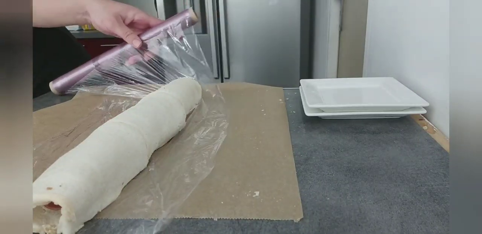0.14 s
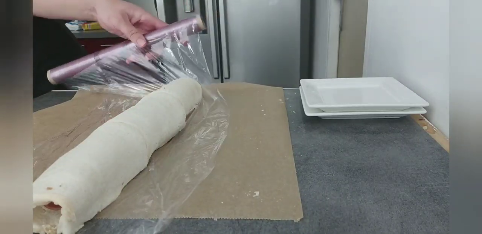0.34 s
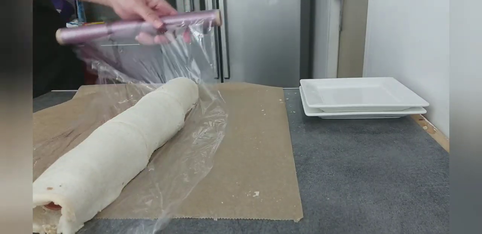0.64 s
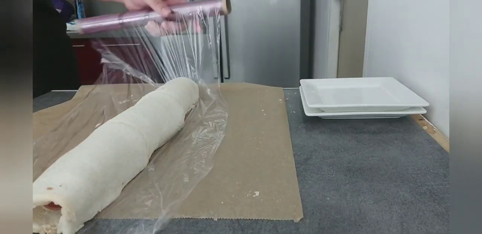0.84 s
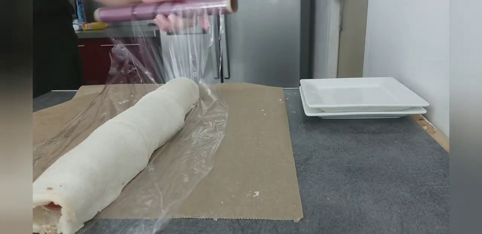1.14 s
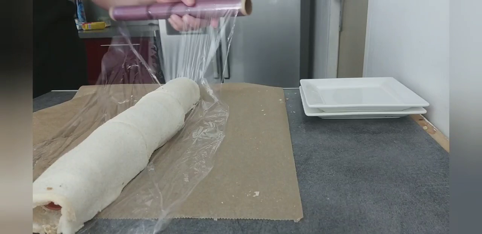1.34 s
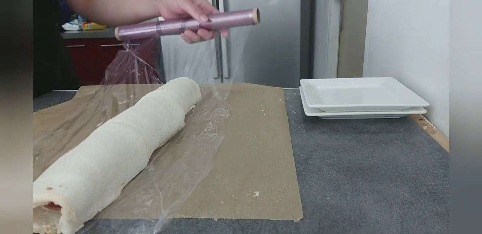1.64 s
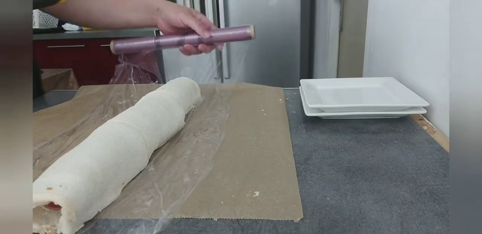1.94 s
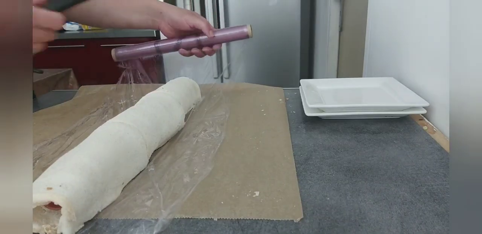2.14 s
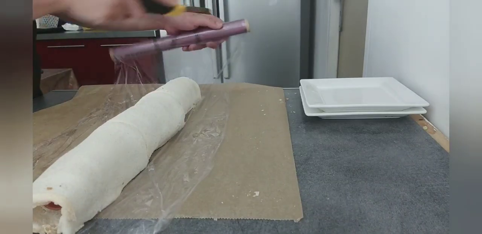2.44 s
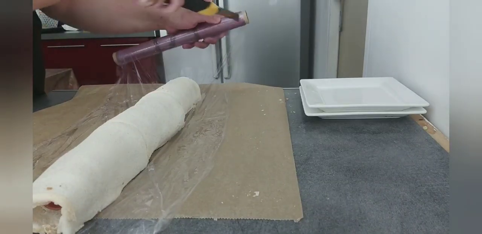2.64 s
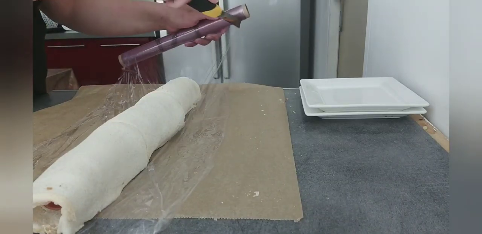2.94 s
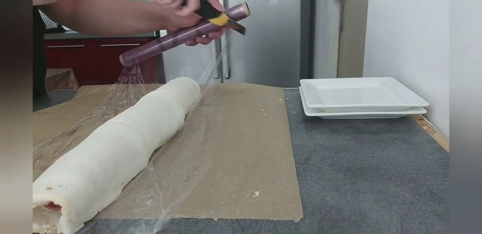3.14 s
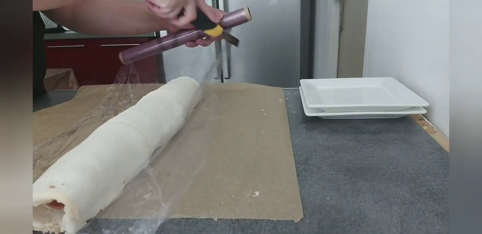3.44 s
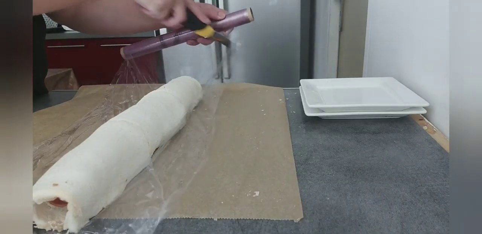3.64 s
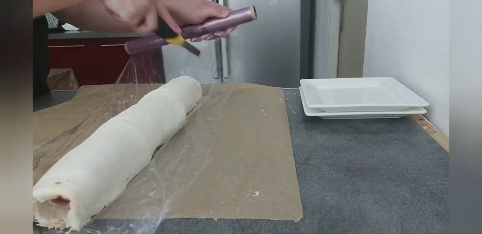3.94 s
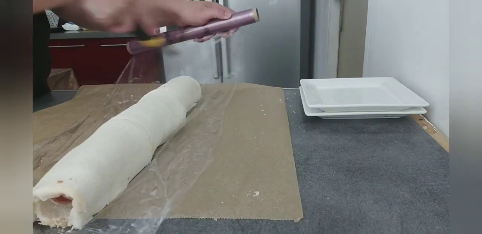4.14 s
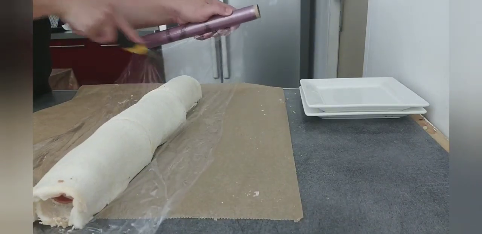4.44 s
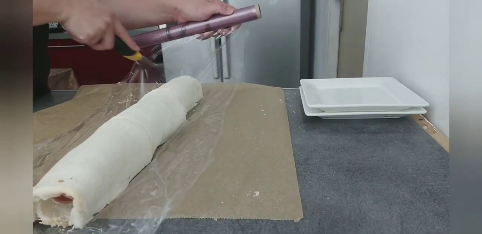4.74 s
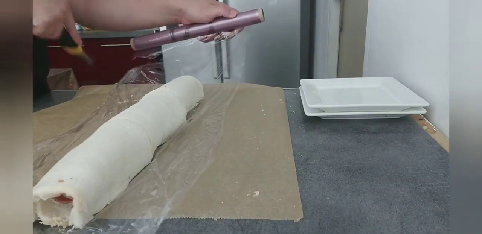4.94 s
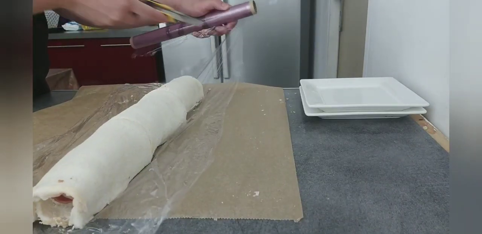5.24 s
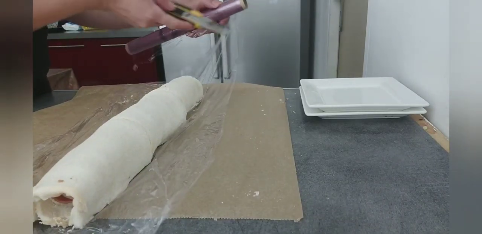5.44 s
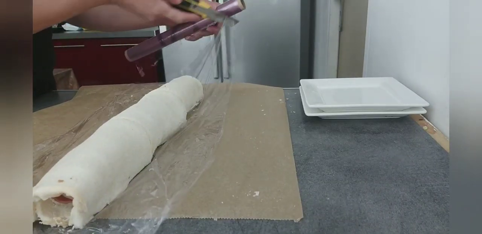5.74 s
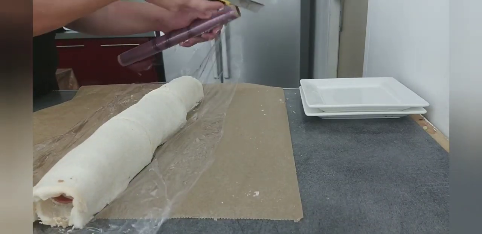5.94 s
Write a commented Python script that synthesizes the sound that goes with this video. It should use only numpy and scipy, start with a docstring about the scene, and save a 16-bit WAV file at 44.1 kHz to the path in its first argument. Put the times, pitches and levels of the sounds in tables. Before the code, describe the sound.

Cling film crinkles softly, crackles brightly as it is pulled taut, then ticks and snaps intermittently while being cut, with a low appliance drone behind.

```python
"""A rustle and a snap open the scene: cling film is pulled off a roll, stretched and cut with a blade.
The place is a hard-walled kitchen, with the phone's two microphone ports about a metre away.
Snaps are swelling bursts of tiny clicks and rustles are lumpy streams of them, both coloured by three rings.
Worktop and wall echoes and a diffuse noise tail place the film in the room.
A wavering low drone with a steadier upper part, and hiss, lie behind it."""
import sys
import numpy as np
from scipy import signal
from scipy.fft import rfft, irfft, next_fast_len
from scipy.io import wavfile
from scipy.ndimage import uniform_filter1d

SR = 44100
rng = np.random.default_rng(int(sys.argv[2]) if len(sys.argv) > 2 else 0)


def dump_mix(stems):
    """Bounce the given channels to the path in sys.argv[1] as a 16-bit WAV at rate SR."""
    frames = np.atleast_2d(stems).T  # one column per channel
    limited = np.clip(frames, -1, 1)  # hard clip at full scale
    pcm = np.round(limited * 32767).astype(np.int16)
    wavfile.write(sys.argv[1], SR, pcm)


N = 268975  # samples, about 6.1 s

# How the sheet hangs as it is drawn out, peeled and cut. Each row: time in seconds, highest ring in Hz
# (before the slide factor), its nominal dB over the middle ring, sharpness of a snap's rings in dB.
STRETCH = [(0, 7000, -9, 17), (.5, 5780, 2, 3), (1.3, 5580, -4.5, 10.5), (1.55, 6960, -7.5, 4),
           (1.72, 6800, 3.5, 5.5), (2.029, 6230, -8.5, 6.5), (2.2, 5300, -5.5, 7), (2.9, 5000, -9, 10.5),
           (3.3, 5300, 1.5, 1.5), (4.1, 5580, 1, 8), (4.851, 5440, 2, 4), (5.3, 4900, -11.5, 12.5),
           (5.5, 5300, 7, 3), (5.8, 5500, -8, 8.5), (6.1, 5300, 12, 10)]
GRAIN_BANDS = 80  # random values for the uneven bands of one crease


def snaps():
    """Creases snap: each burst of clicks swells, peaks after 2.4 ms and dies, ringing the sheet."""
    # Each row: time in seconds, nominal peak in dB, lowest ring in Hz (before a 0.98 factor),
    # its nominal dB under the peak, middle ring in Hz (same factor), nominal bass and top in dB under the peak.
    creases = [(0.052, -25, 1170, -3.5, 3980, -28, -39), (0.298, -32, 1470, 5, 3300, -22, -41),
               (0.381, -33, 1270, -12, 4650, -4, -36), (0.708, -49, 2020, -13, 3820, -21, -24),
               (1.102, -41, 2440, -11, 4370, -14, -13), (1.201, -48, 1770, -12, 4400, -24, -25),
               (1.303, -25, 1760, -21.5, 3590, -62, -50), (1.367, -35.5, 2090, -27, 3500, -46, -35),
               (1.545, -31, 1970, -26, 3140, -59, -40), (1.59, -31.5, 1810, -20, 3530, -53, -38.5),
               (1.714, -8, 1810, -24, 4330, -64, -30.5), (1.76, -11.5, 1850, -17, 4200, -57, -22),
               (1.829, -9.5, 1730, -16, 4500, -64, -19.5), (1.874, -5.5, 1920, -20.5, 4260, -67, -26.5),
               (1.903, -4, 1750, -25.5, 4420, -85, -32), (1.924, -10, 2150, -13.5, 3880, -59, -26),
               (1.968, -17, 1330, -21.5, 4330, -57, -19), (1.999, -14, 1410, -15, 4450, -71, -23),
               (2.039, -12.5, 1400, -17.5, 4300, -72, -25), (2.192, -33, 1600, -18, 3010, -49, -55),
               (2.272, -34.5, 1530, -13, 4320, -38, -48), (2.307, -27, 1410, -21.5, 3950, -49, -43.5),
               (2.493, -52.5, 2090, -17.5, 3660, -18.5, -32.5), (2.516, -50, 1560, -3.5, 3010, -15.5, -34),
               (2.87, -44.5, 1540, -6.5, 3840, -33, -38), (3.33, -39.5, 1650, -17, 4120, -22, -32),
               (3.378, -13.5, 1600, -10.5, 3150, -22, -34), (3.564, -34, 1550, -12, 4150, -51, -32),
               (3.575, -32.5, 1920, -20, 4400, -44, -26), (3.634, -38.5, 1200, -10, 4250, -28.5, -26),
               (3.68, -22, 1600, -13.5, 4550, -20, -25), (3.701, -31.5, 1050, 4, 4500, -38, -10),
               (3.797, -23, 1540, -13, 4870, -23, -18.5), (4.057, -35.5, 1980, -15, 4660, -51, -25),
               (4.092, -40.5, 2000, -11, 4630, -27, -19), (4.117, -26.5, 1320, -10.5, 4240, -48, -23),
               (4.127, -31, 1960, -15, 3690, -23, -27), (4.145, -22, 1970, -10.5, 4070, -22, -19),
               (4.415, -43.5, 1100, -18, 4020, -14, -26), (4.447, -33, 1950, -7.5, 3850, -24, -22),
               (4.459, -26, 1960, -11.5, 2680, -28, -21), (4.831, -42, 1174, -14, 2860, -23, -23),
               (4.838, -35.5, 1210, -14.5, 3870, -27, -19.5), (4.922, -30.5, 2070, -16.5, 3240, -42, -37.5),
               (5.227, -40.5, 1270, -23.5, 3260, -34.5, -45), (5.531, -45, 2070, -12, 4580, -23.5, -24),
               (5.701, -50.5, 2230, -7.5, 3780, -12, -28.5), (5.767, -42, 1830, -22, 3840, -33, -32),
               (5.785, -34.5, 2100, -19, 3800, -37, -29), (5.797, -31.5, 2200, -9, 3870, -31, -24),
               (5.816, -31, 1920, -19, 2916, -37, -35), (6.025, -49.5, 1130, -2.5, 3080, -34, -19)]
    swell_s, mid_db, body_db = .0012, -10.5, 2
    energy_db = 11  # summed energy of a snap over the square of its nominal peak
    out = np.zeros((2, N))
    t = np.arange(4096) / SR
    times, *_, sharp_db = np.transpose(STRETCH)
    p = t / swell_s
    for s, db, *row in creases:
        # its clicks are more alike than a rustle's
        burst = p ** 2 * np.exp(-p) * clicks(len(t), spread_db=2)
        # summed over all directions the clicks do not interfere: the walls get one even impulse
        impulse = np.arange(len(t)) == int(2 * swell_s * SR)
        both = np.array([even(burst), impulse])
        colours = colour(s, *row, mid_db, body_db)
        ring_db = np.interp(s, times, sharp_db)
        snap = sheet(both, 0.98, *colours, ring_db, rng.standard_normal(GRAIN_BANDS))
        snap = snap / np.sqrt(np.sum(snap ** 2, axis=1, keepdims=True))
        add(out, s - swell_s, undb(db + energy_db) * snap)
    return out


def rustles():
    """The sheet rustles or drags: clicks in uneven lumps; all three rings slide up, or stay if the slide is 0."""
    # Each row: start in seconds, length in seconds (sound stops at 0.28 s), level in dB before the swell,
    # slide of the rings in octaves, lowest ring in Hz at the start, its nominal dB over the middle ring,
    # middle ring in Hz at the start, nominal bass and top in dB over the middle ring.
    drags = [(0, 0.062, -56.5, .05, 1600, 3, 4280, -9, -26), (.053, 0.11, -38, 0.28, 886, 11, 4400, 1, -15),
             (0.149, 0.26, -52, 0.0062, 1090, -6, 3760, -44, -31),
             (.298, 0.083, -43, 0, 1670, 26, 3100, 6, -11),
             (.369, 0.1, -46.5, 0.14, 980, 13, 4760, 1.5, -17),
             (.5, .11, -62, 0.044, 1130, 0, 3770, -33, -15), (.71, 0.11, -74, 0, 1814, -9, 3970, -29, -14),
             (0.933, 0.12, -72.5, 0.11, 1510, -15, 4400, -36, -12),
             (1.111, 0.07, -62.5, 0.08, 2280, -5, 4400, -49, -10),
             (1.265, 0.056, -62.5, 0.7, 1470, -2, 3500, -43, -33),
             (1.879, 0.11, -38, 0.17, 1910, 3, 4400, -47, -4),
             (1.929, 0.15, -46.5, 0.29, 1066, -0.5, 3000, -45.5, -13.5),
             (2.875, .077, -68, .07, 1450, -28.5, 3050, -44, -49.5),
             (2.96, .1, -76, 0.11, 1500, -8, 4000, -20.5, -17.5),
             (3.131, 0.089, -69.5, 0.35, 1600, 3, 3490, -31, -14.5),
             (3.246, .32, -62.5, 0.19, 1600, -5, 4100, -13.5, -10),
             (3.55, .14, -57, 0.0092, 1600, 0, 4200, -40, -15),
             (3.788, 0.018, -41.5, 0.085, 1490, 1, 4200, -19, -16),
             (3.968, 0.068, -50, 0.016, 1920, -1, 4040, -21.5, -12),
             (4.109, 0.11, -49.5, 0, 1500, 3.5, 3280, -9, -9),
             (4.298, 0.05, -55.5, 0.041, 1780, -3, 3800, -12.5, -27),
             (4.458, .078, -50.5, 0, 2000, -11, 3680, -23, -16),
             (4.649, .075, -63.5, 0.031, 2000, -7, 4020, -12, -19),
             (5.001, 0.37, -86.5, 0, 1820, -10, 4000, -34, -22),
             (5.23, 0.21, -71.5, .51, 1200, -12.5, 3000, -37.5, -35.5),
             (5.362, .17, -64.5, 1, 1367, 5, 2760, -27, -44),
             (5.438, 0.22, -71, 0.31, 2000, -12, 3970, -43, -18.5),
             (5.64, .16, -73, .09, 2000, -9, 4000, -24.5, -29),
             (5.761, .059, -58, 0.031, 1986, -5, 3300, -22, -17),
             (6.032, 0.075, -63, 0.084, 1800, 3, 3500, -17.5, -9)]
    lump_s, lump_db, body_db = 0.0078, 2.5, 4
    loose_ring_db, taut_ring_db = 3.5, 6.5  # loose sheet; extra while it is drawn taut and the rings slide
    out = np.zeros((2, N))
    t = np.arange(12288) / SR
    for s, length, db, octaves, *row in drags:
        p = np.clip(t / length, 0, 1)
        lumps = undb(lump_db * np.interp(t / lump_s, np.arange(128), rng.standard_normal(128)))
        swell = np.sin(np.pi * p ** 0.49) ** 0.77
        rub = swell * lumps * clicks(len(t), spread_db=3)
        ring_db = loose_ring_db + taut_ring_db * (octaves > .1)
        grain = rng.standard_normal(GRAIN_BANDS)
        colours = colour(s, *row, 0, body_db)
        # five overlapping pieces, each with its rings a step further along
        for k in range(5):
            piece = rub * np.clip(1 - abs(4 * p - k), 0, 1)
            slide = 2 ** (octaves * k / 4)
            add(out, s, undb(db) * sheet(piece[None], slide, *colours, ring_db, grain))
    return out


def film():
    """The whole sheet; rows are the sound towards the phone and the sound towards the walls."""
    return snaps() + rustles()


def clicks(count, spread_db):
    """Sparse clicks of both signs and uneven size over faint noise, rms 1."""
    clicks_per_s, limit = 4200, 4.5  # limit: the largest click, in spreads above the smallest
    u, e, noise = rng.random(count), rng.exponential(size=count), rng.standard_normal(count)
    size = undb(spread_db * np.minimum(e, limit))
    x = (u < clicks_per_s / SR) * np.sign(noise) * size + 0.17 * noise
    return x / np.sqrt(np.mean(x ** 2))


def even(x):
    """The same burst with its broad spectrum flattened, energy about 1."""
    lines = rfft(x)
    return irfft(lines / np.sqrt(uniform_filter1d(abs(lines) ** 2, size=40)))


def colour(s, low_hz, low_db, mid_hz, bass_db, top_db, mid_db, body_db):
    """Rings, bass, top and body of the sheet at time s; the highest ring follows the stretch."""
    body_share = 0.55  # the body's level is a blend of lowest ring and bass, plus body_db
    times, hz, db, _ = np.transpose(STRETCH)
    body = body_share * low_db + (1 - body_share) * bass_db + body_db
    high_hz, high_db = np.interp(s, times, hz), mid_db + np.interp(s, times, db)
    return low_hz, low_db, mid_hz, mid_db, high_hz, high_db, bass_db, top_db, body


def sheet(x, slide, low_hz, low_db, mid_hz, mid_db, high_hz, high_db, bass_db, top_db, body_db, ring_db, grain):
    """Colour of the film: three rings on a slope that joins them, scaled to the gain's mean power."""
    hz = np.fft.rfftfreq(x.shape[-1], 1 / SR)
    rings = [(low_hz * slide, low_db + 1.5), (mid_hz * slide, mid_db), (high_hz * slide, high_db - 1)]
    # bass, then body and shoulder at fixed parts of the unslid lowest ring, rings, top
    slope = spectrum(hz, [(60, bass_db - 8.5), (160, bass_db + 10.0), (0.53 * low_hz, body_db),
                          (0.61 * low_hz, low_db - 0.5), *rings, (11000, top_db + 4.5)])
    # every crease has its own uneven bands and gaps
    grain_db, grain_octaves = 3, .2
    bands = grain_db * np.interp(np.log2(hz + 1) / grain_octaves, np.arange(GRAIN_BANDS), grain)
    peaks = sum(max(ring_db, 0) * bump(hz, f, octaves=.13) for f, _ in rings)
    gain = causal(slope + bands + peaks)
    return irfft(rfft(x) * gain) / np.sqrt(np.mean(abs(gain) ** 2))


def add(out, s, x):
    """Lay x into out from s seconds, cut at the end."""
    i = int(s * SR)
    out[:, i:i + x.shape[1]] += x[:, :out.shape[1] - i]


def kitchen(direct, spread):
    """Direct sound, echoes, a quick noise cluster and a diffuse tail; rows are middle and side."""
    # Reverberation of the room. Each row: frequency in Hz, time to fall by 60 dB in seconds.
    room_t60 = [(125, 0.51), (400, 0.47), (1500, 0.38), (5000, .38), (12000, 0.11)]
    # Worktop and nearest wall. Each row: delay in seconds, level in dB.
    surfaces = [(.0036, -15.5), (0.0167, -17)]
    tail_db, early_db, early_s = -3, -5.5, 0.0057
    t = np.arange(30000) / SR
    hz = np.fft.rfftfreq(len(t), 1 / SR)
    tails = 0
    for centre_hz in 125 * 2. ** np.arange(8):
        band = irfft(rfft(rng.standard_normal((2, len(t)))) * bump(hz, centre_hz, 0.75))
        tails = tails + band * 10 ** (-3 * t / spectrum(centre_hz, room_t60))
    tails = tails * (1 - np.exp(-t / 0.0024))  # builds up over milliseconds
    early = rng.standard_normal((2, len(t))) * np.exp(-t / early_s)
    response = 0
    for db, part in ((tail_db, tails), (early_db, early)):
        response = response + undb(db) * part / np.sqrt(np.sum(part ** 2, axis=1, keepdims=True))
    echoes = [undb(db) * np.pad(direct, (int(s * SR), 0))[:N] for s, db in surfaces]
    near = np.array([direct + sum(echoes), echoes[0]])  # the worktop echo also reaches the side
    return signal.fftconvolve(spread[None], response, axes=1)[:, :N] + near


def hum():
    """Steady appliances: shaped noise whose low drone wavers in level."""
    # Colour of the appliances. Each row: frequency in Hz, relative density in dB.
    drone = [(15, -44.5), (40, -11.5), (108, -2), (141, -3.5), (175, -0.5), (270, -16.5), (335, -5),
             (363, -13), (591, -12.5), (641, -15), (714, -19.5), (1370, -21), (2840, -26.5), (7110, -32),
             (16000, -32)]
    level_db = -68.5
    size = N + N % 2
    hz = np.fft.rfftfreq(size, 1 / SR)
    lines = rfft(rng.standard_normal((2, size))) * undb(spectrum(hz, drone))
    low = 1 / (1 + (hz / 220) ** 4)
    waver_db = 3.4 * np.interp(np.arange(N), np.linspace(0, N, 40), rng.standard_normal(40))
    x = irfft(lines * low)[:, :N] * undb(waver_db) + irfft(lines * (1 - low))[:, :N]
    return x * undb(level_db) / np.sqrt(np.mean(x ** 2))


def hiss():
    """Faint white noise, before the side is coloured."""
    return undb(-86) * rng.standard_normal((2, N))


def port_colour(hz):
    """Resonances and a dip at the phone's port, as a minimum-phase response."""
    # Each row: centre in Hz, width in octaves, gain in dB.
    port = [(4400, 0.078, 1.5), (7550, 0.16, 5), (9430, 0.18, -9), (13400, 0.067, 0)]
    return causal(sum(db * bump(hz, f, octaves) for f, octaves, db in port))


def two_ports(mid, side, hz, size):
    """Left and right from middle and side; the left port is a little louder around 1600 Hz."""
    # Width between the ports. Each row: frequency in Hz, gain of the side signal in dB.
    width = [(100, -28.5), (600, -39.5), (1200, -31), (1800, -8), (2600, -20), (5000, -32.5), (12000, -6.5)]
    lean = .12 * bump(hz, 1600, octaves=.3)  # share of the middle added to the side
    lines = rfft(side, size) * undb(spectrum(hz, width)) + rfft(mid, size) * lean
    side = irfft(lines)[:N]
    return np.array([mid + side, mid - side])


def undb(db):
    """Amplitude for a level in dB."""
    return 10 ** (np.asarray(db) / 20)


def spectrum(hz, points):
    """Values of a (Hz, value) table, straight on a log-frequency axis."""
    f, v = np.transpose(points)
    return np.interp(np.log(hz + 1), np.log(f), v)


def bump(hz, centre_hz, octaves):
    """Bell of height 1 on a log-frequency axis."""
    return np.exp(-.5 * (np.log2((hz + 1) / centre_hz) / octaves) ** 2)


def causal(db):
    """Minimum-phase response for a gain in dB on an rfft grid."""
    cepstrum = irfft(db * np.log(10) / 20)
    half = len(cepstrum) // 2
    cepstrum[1:half] *= 2
    cepstrum[half + 1:] = 0
    return np.exp(rfft(cepstrum))


def scene():
    """Film in the kitchen through the port, over hum and hiss, spread to the two ports."""
    size = next_fast_len(N + 4096) // 2 * 2 + 2
    hz = np.fft.rfftfreq(size, 1 / SR)
    room = kitchen(*film())
    at_port = irfft(rfft(room, size) * port_colour(hz))[:, :N]
    mid, side = at_port + hum() + hiss()
    return two_ports(mid, side, hz, size)


def record(dry):
    """The phone cuts the top: a steep elliptic low-pass at 15.9 kHz."""
    return signal.sosfilt(signal.ellip(10, .2, 60, 15900, fs=SR, output="sos"), dry)


dry = scene()
out = record(dry)
dump_mix(out)
```